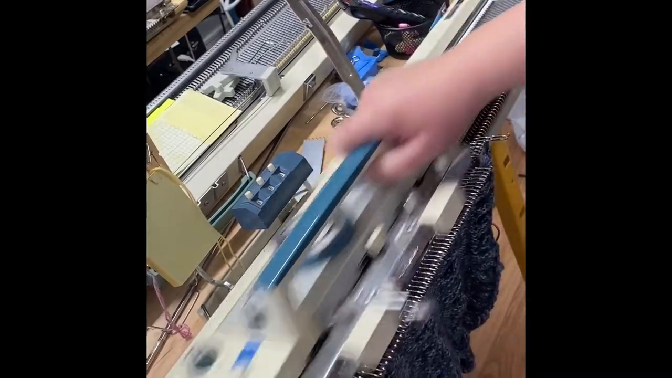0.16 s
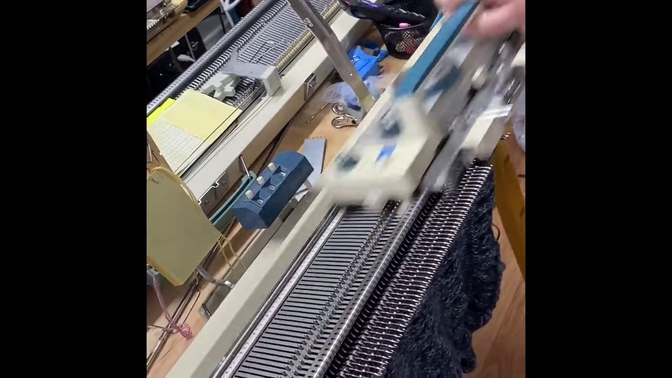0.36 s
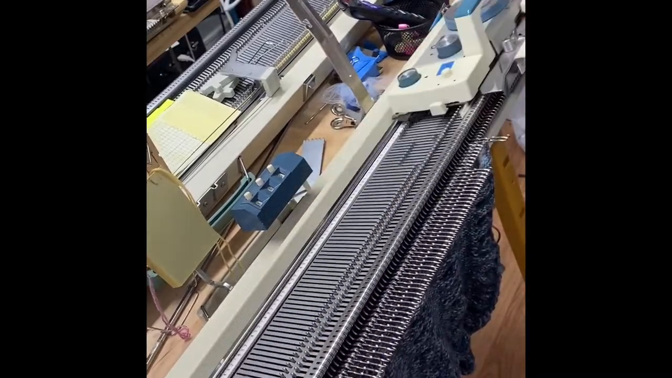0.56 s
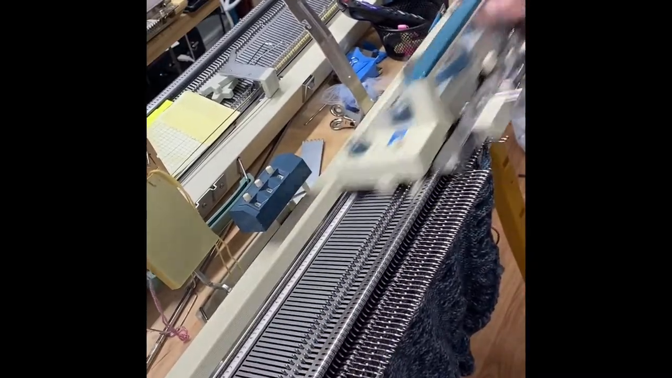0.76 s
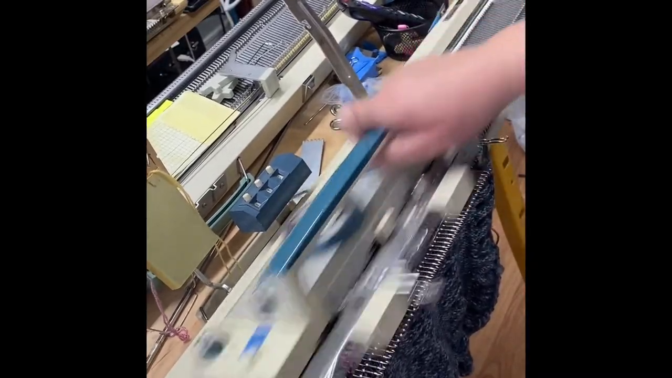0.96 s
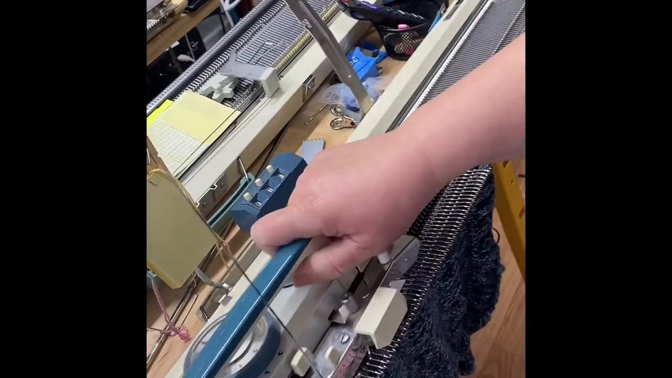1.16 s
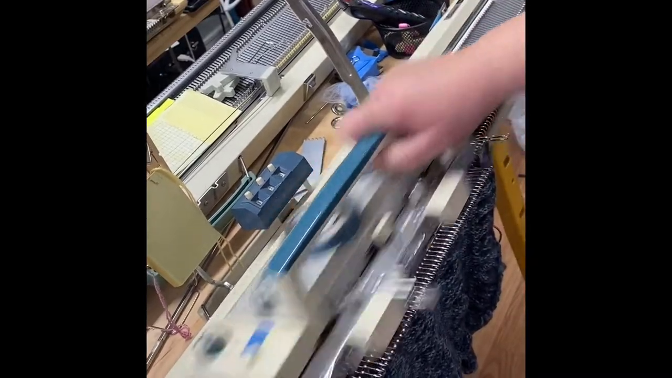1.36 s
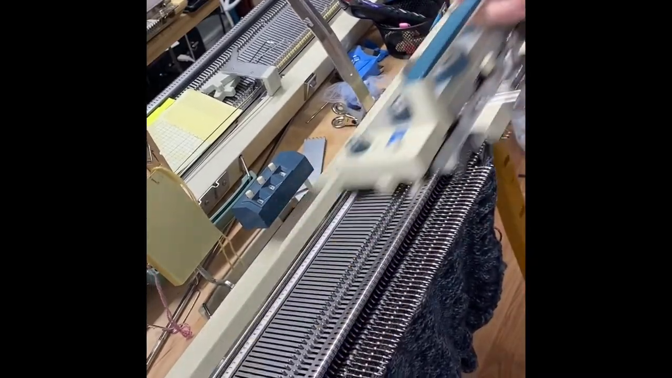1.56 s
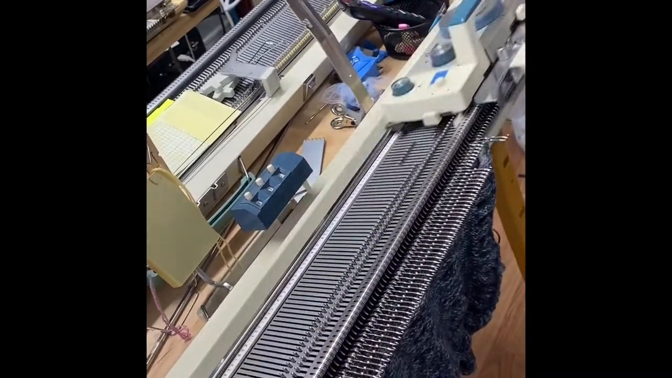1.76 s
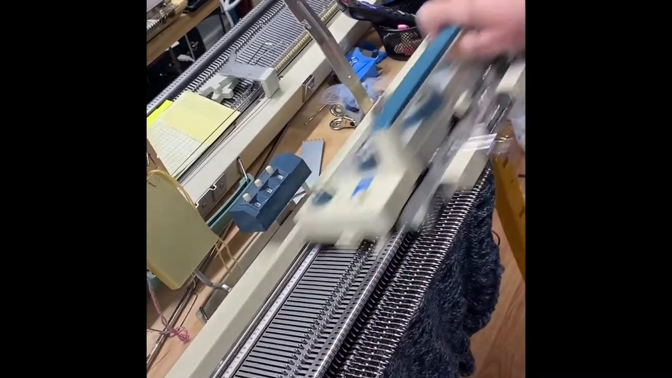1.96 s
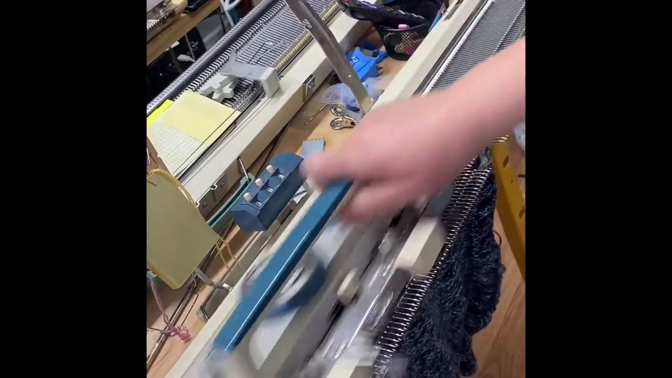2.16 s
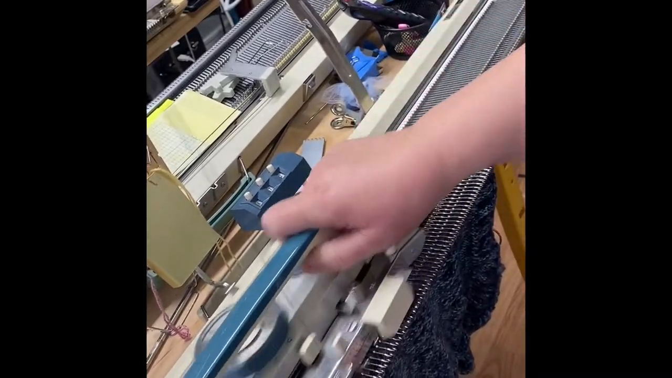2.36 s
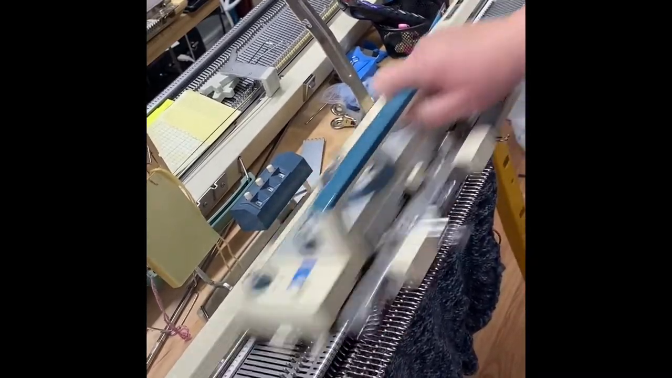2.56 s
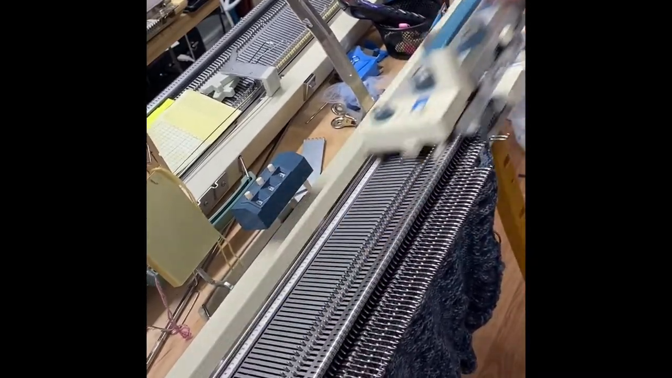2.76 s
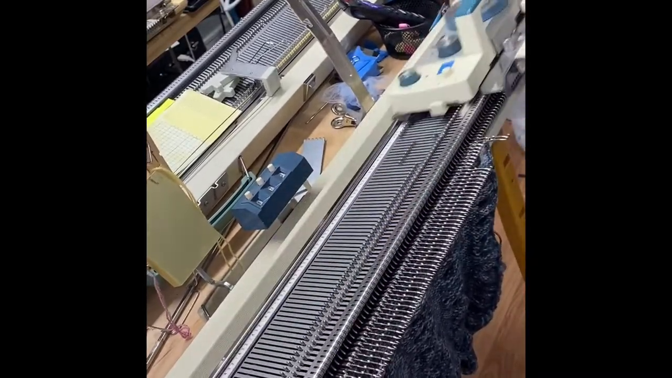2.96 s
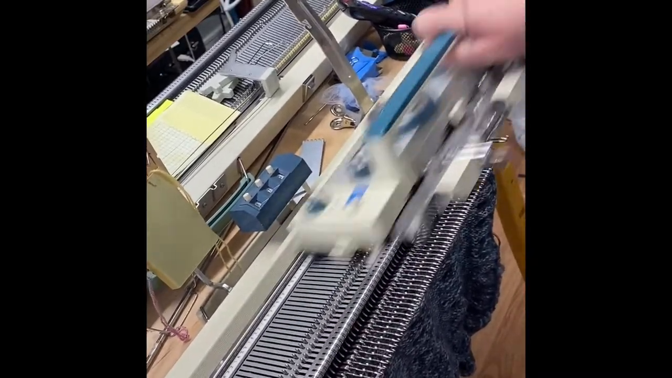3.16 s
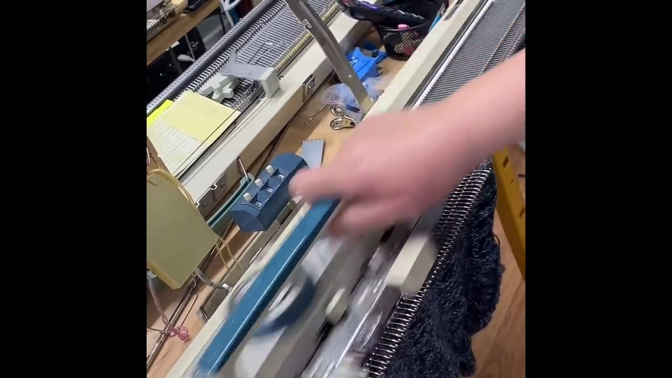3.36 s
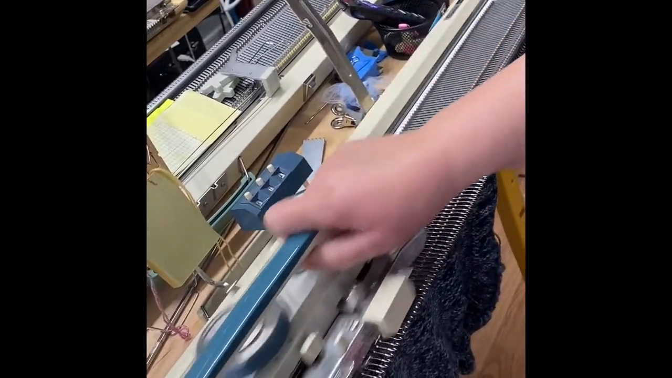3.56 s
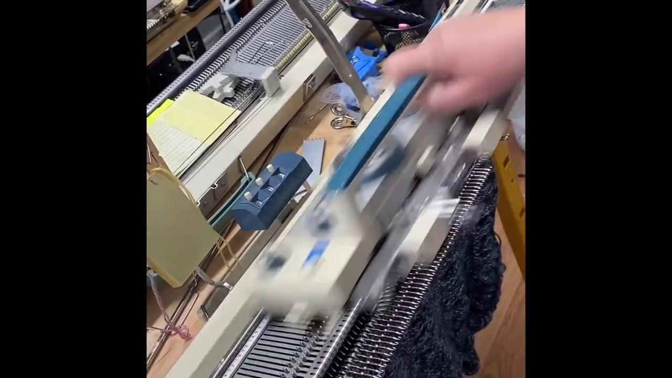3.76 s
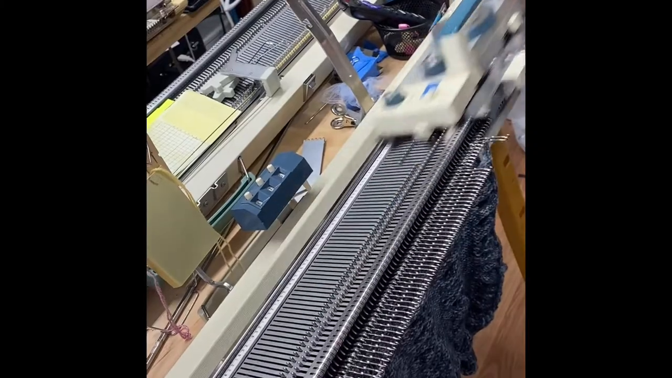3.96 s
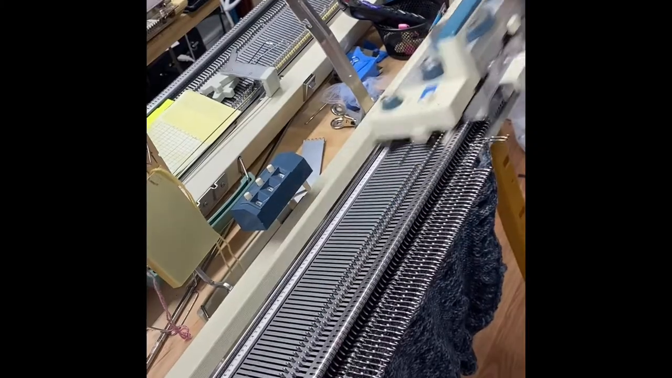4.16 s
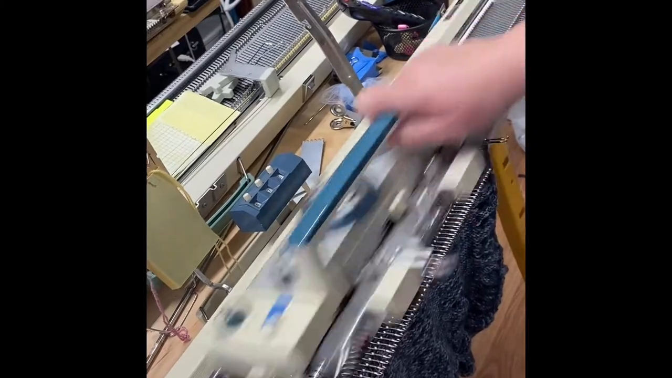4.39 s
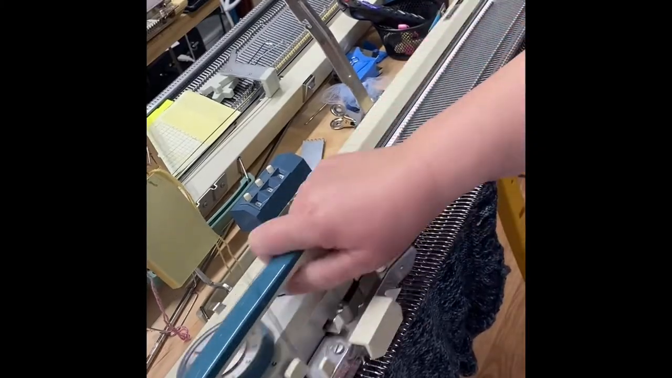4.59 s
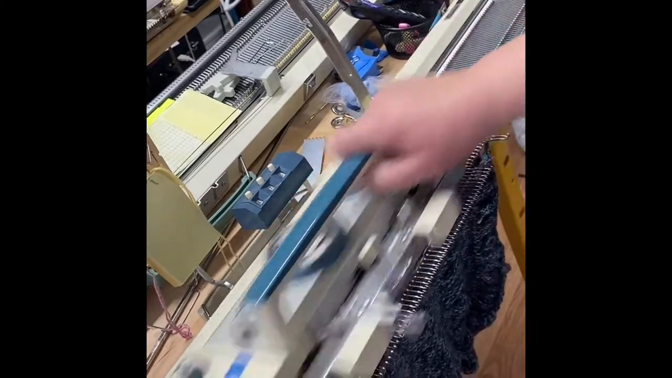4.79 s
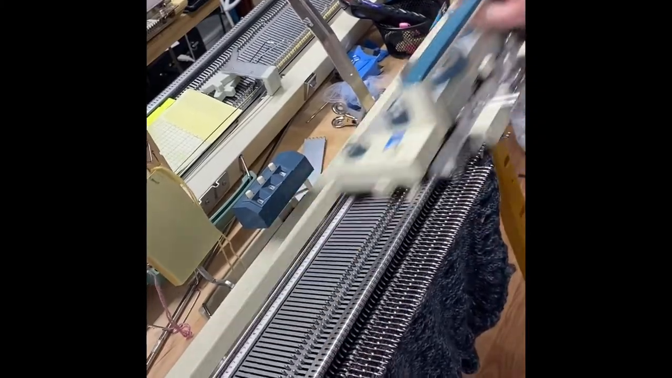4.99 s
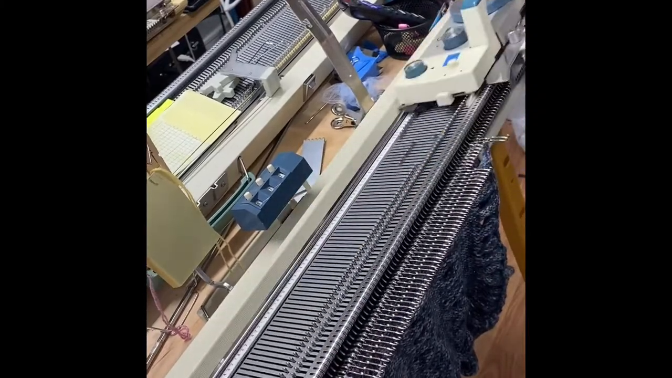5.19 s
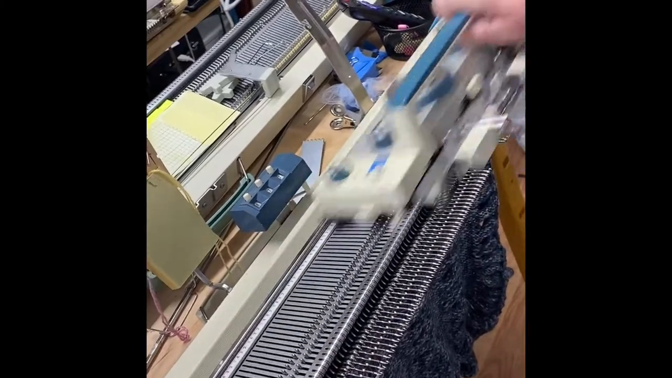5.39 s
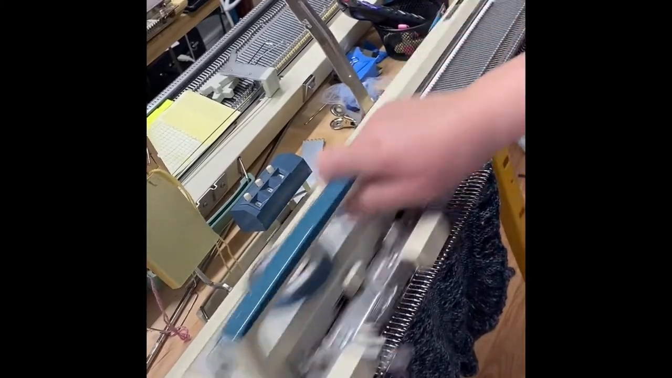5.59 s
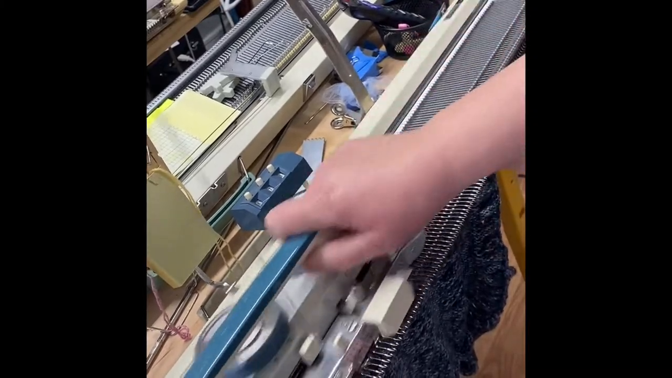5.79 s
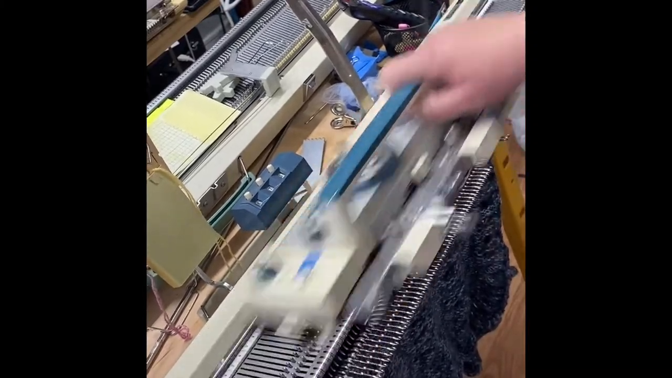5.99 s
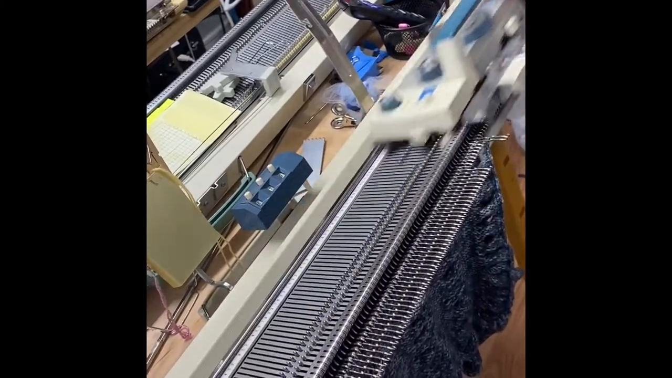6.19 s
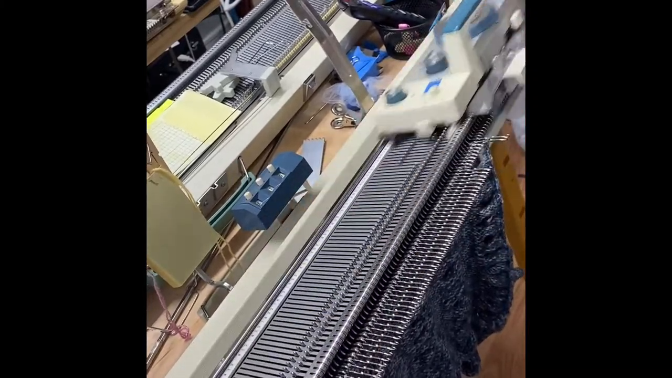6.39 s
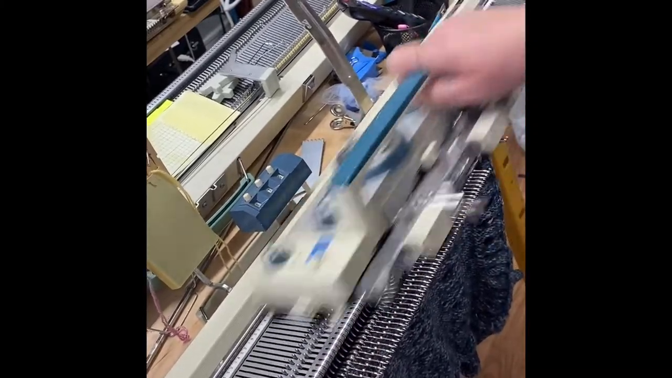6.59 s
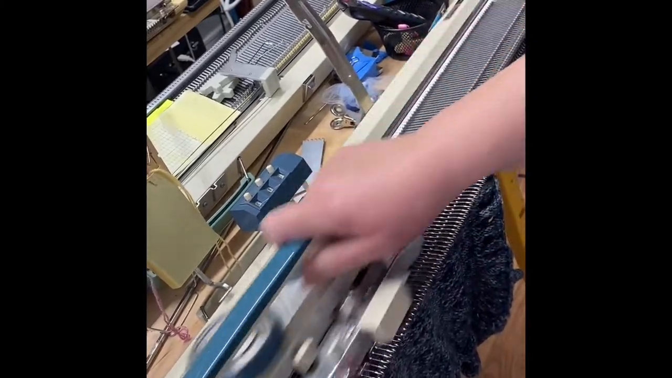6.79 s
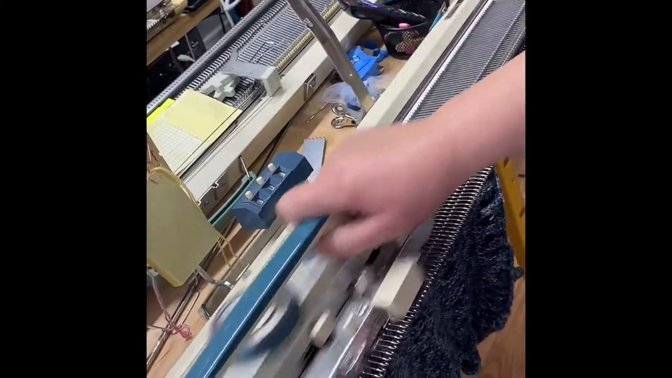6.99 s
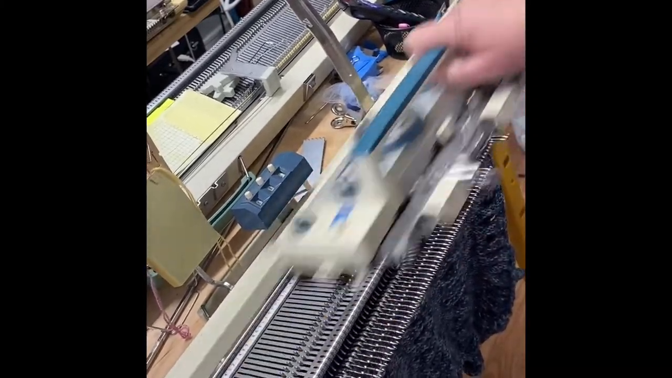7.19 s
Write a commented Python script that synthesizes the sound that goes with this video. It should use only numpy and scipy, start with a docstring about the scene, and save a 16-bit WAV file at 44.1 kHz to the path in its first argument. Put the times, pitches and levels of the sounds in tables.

```python
"""In a small room, close to a phone, a knitting machine carriage is pushed to and fro by hand, thirteen strokes.
Its cams strike the row of steel needles at a rate that follows the speed, and the rails rasp: noise bursts
and steady noise, coloured by the needles and by the ringing of the plate and the bed.
The table rumbles under the load, with dull thuds from the middle of the strokes onward; at each turn the cams
flip over with a tick. A quiet room lies behind, and near walls return a short tail to left and right."""
import sys
import numpy as np
from scipy import signal
from scipy.fft import rfft, irfft, next_fast_len
from scipy.io import wavfile
from scipy.ndimage import uniform_filter1d

SR = 44100
rng = np.random.default_rng(int(sys.argv[2]) if len(sys.argv) > 2 else 0)


def write(x):
    x = np.atleast_2d(x).T
    wavfile.write(sys.argv[1], SR, np.round(np.clip(x, -1, 1) * 32767).astype(np.int16))


N = 319284  # samples
T = np.arange(N) / SR
FFT_SIZE = next_fast_len(N + 8192, True)  # leaves space for the tails
HZ = np.fft.rfftfreq(FFT_SIZE, 1 / SR)

# Strokes, away from the phone and back in turn. Each row: start in seconds, push in dB,
# hurry as the share of the stroke gained by its middle, relative level of the cam tick in dB.
STROKE_ROWS = [(-.005, -0.5, 0.017, -37), (0.5819, 0, -0.023, -32), (1.1664, 0, -.009, -31),
               (1.7367, -0.4, 0.011, -30), (2.3159, -0.16, 0.0026, -29.5), (2.9105, 0.4, -0.012, -31),
               (3.497, 0, -0.0075, -32), (4.0675, -0.1, 0.017, -30.5), (4.6254, 0.56, .002, -31),
               (5.194, .3, 0.02, -27.5), (5.7525, -0.57, 0.0028, -30), (6.3138, -0.3, 0.017, -30.5),
               (6.8915, -0.5, -0.021, -33)]
# Colour of the steel needles. Each row: frequency in Hz, level in dB.
STEEL_COLOUR = [(200, -45), (500, -29.5), (900, -11), (1500, -10), (2300, -7), (2750, -2), (3750, -2.5),
                (4250, -5.5), (4600, -3), (5000, -2), (6300, 1), (7400, -2.4), (10300, 1.5), (13000, -2),
                (15300, -6)]
# Colour of the table's rumble. Each row: frequency in Hz, level in dB.
TABLE_COLOUR = [(20, -40), (35, -36), (50, 1.5), (68, 1), (85, -2), (125, -14), (200, -18), (500, -59)]


def motion(needles_per_stroke=115, last_stop_s=7.46, rest_s=.012, jerk=0.2):
    """The arm jerks off, swings like a pendulum and rests before each turn.

    Returns stroke number, share of it done, place (0 near, 1 far), speed (about 0-1), needles passed.
    """
    start, _, hurry, _ = np.transpose(STROKE_ROWS)
    stroke = np.maximum(np.searchsorted(start, T) - 1, 0)
    length = np.diff(np.append(start, last_stop_s)) - rest_s
    done = np.clip((T - start[stroke]) / length[stroke], 0, 1)
    done = np.clip(done + hurry[stroke] * np.sin(np.pi * done), 0, 1)
    travel = (1 - np.cos(np.pi * done)) / 2
    place = np.where(stroke % 2, 1 - travel, travel)
    # the jerk lifts the speed at the start and fades along the stroke
    speed = (np.sin(np.pi * done) + jerk * (1 - done)) / (1 + jerk / 2)
    speed = np.abs(uniform_filter1d(speed, size=96))  # the carriage's mass rounds the jerk
    passed = needles_per_stroke * (stroke + travel)
    return stroke, done, place, speed, passed


def needle_rattle(speed, passed, size=1600):
    """Every cam hits every needle; needles sit a little loose, so no two blows are alike."""
    # Cams that meet the needles. Each row: place along the carriage in needle spacings, level in dB.
    cam_rows = [(0, 0), (.2, -6), (.5, -8)]
    play, scatter_db = .08, 2.6  # play in needle spacings
    times, sizes = [], []
    for offset, db in cam_rows:
        chance = rng.standard_normal((size, 2))
        where = np.arange(size) + offset + play * chance[:, 0]
        met = where < passed[-1]
        times.append(np.interp(where, passed, T)[met])
        sizes.append(undb(db + scatter_db * np.tanh(chance[:, 1]))[met])
    blows = ticks(np.concatenate(times), np.concatenate(sizes), crack_s=.0012, ring_s=.006, ring_db=-5)
    return unit(blows / np.sqrt(speed + .5))  # slow blows are few, so each stands out more


def contact(speed, passed, rub_db=0.5, grit_db=-0.74, judder_db=0.71, grip_db=0.62):
    """Needle blows over the rasp of the sliding rails, all juddering with the hand's push."""
    rails = undb(rub_db + grit_db * walk(400)) * noise()
    judder = undb(judder_db * walk(70) + grip_db * walk(25))
    return unit((needle_rattle(speed, passed) + rails) * judder)


def needle_ring(drive, place, count=5):
    """The needles ring; each stretch of the bed has its own reflections, so the colour shifts with travel."""
    # Peaks of the needles' ring. Each row: frequency in Hz, width in Hz, dB relative to their colour.
    needle_peaks = [(1940, 28, -10), (3700, 340, -21), (4910, 63, 1.5), (5370, 180, -7.5)]
    # Change of colour from the near to the far end of the bed. Each row: frequency in Hz, change in dB.
    far_change = [(500, 22.5), (1000, 2), (1500, -2), (2100, 9), (3000, -10.5), (4000, -1), (5500, 2.5),
                  (8000, -2), (14000, 3.5)]
    ring = rfft(drive, FFT_SIZE) * colour(STEEL_COLOUR) * (1 + modes(needle_peaks))
    far, out = colour(far_change), 0
    for spot in np.linspace(0, 1, count):
        nearness = np.maximum(1 - np.abs(place - spot) * (count - 1), 0)
        out = out + nearness * irfft(ring * far ** (spot - .5) * bounces(), FFT_SIZE)[:, :N]
    return unit(out)


def needles(drive, done, place, speed):
    """The needles' ring grows steeply with the carriage's speed."""
    # Answer to the motion: level in dB, power of speed, dB gained over a stroke, dB gained at the far end.
    needle_law = (-20.5, 1.8, 1, .3)
    return needle_ring(drive, place) * effort(needle_law, done, place, speed)


def snaps(snap_db=-2, flip_db=-3, slide_db=-18, slide_s=0.0072):
    """The cams slide over and seat with a tick as each stroke begins; now and then a needle snaps past."""
    # Single needles snapping past. Each row: time in seconds, relative level in dB.
    snap_rows = [(0.6499, -25), (0.6838, -24), (0.6933, -20), (0.701, -18), (0.7064, -23), (1.413, -7),
                 (1.816, -12), (2.9911, -33), (3.589, -27), (3.6034, -27), (4.1275, -27), (4.85, -13),
                 (5.2639, -25), (6.4083, -27)]
    start, _, _, tick_db = np.transpose(STROKE_ROWS)
    times, db = np.transpose(snap_rows)
    slide_sizes = undb(tick_db + flip_db + slide_db)
    slides = ticks(start - slide_s, slide_sizes, crack_s=0.0073, ring_s=.02, ring_db=-2)
    flip_sizes = undb(tick_db + flip_db)
    flips = ticks(start + 0.00092, flip_sizes, crack_s=0.0016, ring_s=0.037, ring_db=-8.5, size=4096)
    snapped = ticks(times, undb(db + snap_db), crack_s=0.0011, ring_s=0.024, ring_db=-16.0)
    return filtered(slides + flips + snapped, colour(STEEL_COLOUR))


def carriage_plate(drive, done, place, speed):
    """The carriage plate rings with the contact and with smooth rubbing from the rails; its level wavers."""
    # Ringing of the plate. Each row: frequency in Hz, width in Hz, level in dB.
    plate_modes = [(716, 8.1, -5), (850, 21, 0), (992, 88, -1.5), (1335, 54, -9), (1443, 60, 2.5),
                   (1630, 700, -1.5), (2047, 53, 8)]
    # Answer to the motion: level in dB, power of speed, dB gained over a stroke, dB gained at the far end.
    plate_law = (-36.5, 2.03, 12.5, 4)
    ring = unit(filtered(drive + 1.06 * noise(), modes(plate_modes)))
    return ring * effort(plate_law, done, place, speed) * undb(2.4 * walk(30))


def needle_bed(drive, done, place, speed):
    """The bed rings lower, driven by the same contact and smooth rubbing; its level wavers."""
    # Ringing of the bed. Each row: frequency in Hz, width in Hz, level in dB.
    bed_modes = [(174.5, 14, -2), (271.4, 25, 4.5), (338.7, 44, 2), (452, 34, 1), (548, 60, -3.5),
                 (650, 190, -7)]
    # Answer to the motion: level in dB, power of speed, dB gained over a stroke, dB gained at the far end.
    bed_law = (-49.5, 0.85, 4.5, -1.5)
    ring = unit(filtered(drive + noise(), modes(bed_modes)))
    return ring * effort(bed_law, done, place, speed) * undb(2.1 * walk(20))


def bites(stroke, done):
    """Gains of needles, plate and bed where the cams bite into the knitting."""
    # Bites on strokes away from the phone. Each row: place as a share of the stroke, length as a share,
    # then dB added to needles, plate and bed.
    away_rows = [(.16, 0.077, -0.1, 0, 6), (.4, 0.057, 2, 2, 4), (.52, 0.015, 1.6, 5, 2),
                 (.62, 0.053, -1.4, 1.5, 9.5), (.78, 0.083, 2, -4, -3.5)]
    # Bites on strokes back. Each row: place and length as shares of the stroke, then dB as above.
    back_rows = [(.06, .03, -2, 13, 4), (.19, .06, 1, 1.5, .5), (.38, .07, 1.2, -0.4, 1.5),
                 (.52, 0.034, .5, 5, 0.45), (.66, 0.025, 0.9, 4, 2.5), (.82, 0.11, 2, -.5, 5)]

    def extra_db(rows):
        return sum(np.outer(db, np.exp(-((done - at) / length) ** 2)) for at, length, *db in rows)

    return undb(np.where(stroke % 2, extra_db(back_rows), extra_db(away_rows)))


def table_rumble(done, place, speed):
    """Low noise of the table under the load; it depends only weakly on speed."""
    # Answer to the motion: level in dB, power of speed, dB gained over a stroke, dB gained at the far end.
    table_law = (-60, 0.17, 7.5, -4)
    return unit(filtered(noise(), colour(TABLE_COLOUR))) * effort(table_law, done, place, speed)


def thuds(thud_db=-1, build_s=.01):
    """Single shoves that the table answers with a few slow cycles, strongest just after the shove."""
    # Dull thuds from the middle of the strokes onward. Each row: time in seconds, relative level in dB.
    thud_rows = [(0.282, -47), (0.351, -37), (1.008, -40), (1.074, -45), (1.54, -39), (2.151, -40),
                 (2.613, -48), (2.676, -40), (2.739, -46), (3.375, -48), (3.855, -40), (4.481, -39),
                 (4.989, -40), (5.529, -47), (5.586, -40), (5.655, -47), (6.034, -46), (6.099, -43),
                 (6.159, -48), (6.735, -47), (6.811, -47)]
    # Slow sway of the table top. Each row: frequency in Hz, width in Hz, level in dB.
    sway_modes = [(50, 12, -1), (67.6, 14, 0), (82, 22, -6)]
    times, db = np.transpose(thud_rows)
    shoves = np.bincount(((times - build_s) * SR).astype(int), undb(db + thud_db), N)
    response = colour(TABLE_COLOUR) * modes(sway_modes)
    return filtered(shoves, response) / np.abs(irfft(response)).max()


def quiet_room():
    """Steady coloured noise of the room behind the machine."""
    # Colour of the quiet room. Each row: frequency in Hz, level in dB.
    air_colour = [(20, -20), (55, -10), (120, 0), (300, -8.5), (1000, -12), (5000, -10), (16000, -14)]
    return unit(filtered(noise(), colour(air_colour))) * undb(-54.5)


def wall_tail(x, wet_db=-13, t60_s=0.32, size=8192):
    """Near walls return a short, dull tail to each side."""
    age = np.arange(size) / SR
    tail = rng.standard_normal((2, size)) * undb(-60 * age / t60_s) * (age > .005)
    tail /= np.sqrt(np.sum(tail ** 2, axis=1, keepdims=True))
    dullness = colour([(100, -42), (600, 10), (5000, -25.5), (15000, -59.0)])
    return undb(wet_db) * filtered(x, rfft(tail, FFT_SIZE) * dullness)


def ports(x):
    """Sound reaches two ports around the phone; a share of the sound differs between left and right."""
    # Phase between the ports. Each row: frequency in Hz, lead of the left in radians.
    port_phase = [(0, 0), (860, .15), (1300, -.1), (2100, 0), (2700, .45), (4300, .55), (5100, .1),
                  (5700, .9), (6400, 2.5), (7000, 3.1), (8100, 3.3), (9700, 6), (11300, 6.6), (12500, 9),
                  (14300, 9.6), (15400, 12)]
    # Sound that differs between the ports. Each row: frequency in Hz, level in dB.
    port_spread = [(60, -40), (200, -21), (400, -15), (700, -8), (1000, -15), (1800, -20), (2800, -12),
                   (4300, -10), (5100, -15), (6200, -12), (7400, -19), (9000, -10), (13500, -15),
                   (15000, -10)]
    mid, side = x[0], filtered(x[1], colour(port_spread))
    lead = np.exp(.5j * np.interp(HZ, *np.transpose(port_phase)))  # half the lead on each port
    return filtered(np.array([mid + side, mid - side]), np.array([lead, 1 / lead]))


def effort(law, done, place, speed, creep=0.026):
    """Gain of one part: it grows with speed and shifts along the stroke and along the bed."""
    full_db, power, late_db, far_db = law
    return (speed + creep) ** power * undb(full_db + late_db * (done - .5) + far_db * (place - .5))


def ticks(times, sizes, crack_s, ring_s, ring_db, size=640):
    """Steel contacts: noise bursts with a sharp crack and a brief dense ring, overlaps adding in power."""
    age = np.arange(size) / SR
    shape = np.exp(-age / crack_s) + undb(ring_db) * np.exp(-age / ring_s)
    blows = np.bincount(np.clip(times * SR, 0, N).astype(int), sizes ** 2, N)
    power = np.abs(signal.oaconvolve(blows, shape ** 2)[:N])
    return np.sqrt(power) * noise()


def bounces(size=768, echo_db=-8, echo_s=.004):
    """Response of the direct sound plus quick reflections off the machine: a fine ripple in the colour."""
    echoes = rng.standard_normal(size) * np.exp(-np.arange(size) / SR / echo_s)
    return 1 + undb(echo_db) * rfft(echoes / np.linalg.norm(echoes), FFT_SIZE)


def noise():
    """Two unrelated noises: what the ports share and what differs between them."""
    return rng.standard_normal((2, N))


def walk(rate):
    """Random wavering with a spread near 1, in straight lines between knots at a rate per second."""
    knots = rng.standard_normal(4096)
    return 1.2 * np.interp(T * rate, np.arange(len(knots)), knots)


def undb(db):
    """Amplitude gain from dB."""
    return 10 ** (np.asarray(db) / 20)


def unit(x):
    """Scale to rms 1."""
    return x / np.sqrt(np.mean(x ** 2))


def colour(points):
    """Gain at every frequency from (Hz, dB) points."""
    hz, db = np.transpose(points)
    return undb(np.interp(np.log(HZ + 1), np.log(hz), db))


def modes(rows):
    """Summed response of resonances given as (Hz, width in Hz, dB)."""
    return sum(undb(db) * 1j * HZ * width / (hz ** 2 - HZ ** 2 + 1j * HZ * width)
               for hz, width, db in rows)


def filtered(x, response):
    """Pass a sound through a frequency response."""
    return irfft(rfft(x, FFT_SIZE) * response, FFT_SIZE)[..., :N]


def scene():
    """One push drives needles, plate and bed; the table rumbles and thuds beside them."""
    stroke, done, place, speed, passed = motion()
    push = undb(np.array(STROKE_ROWS)[stroke, 1])
    on_needles, on_plate, on_bed = push * bites(stroke, done)
    drive = contact(speed, passed)
    machine = needles(drive, done, place, speed) * on_needles + snaps()
    machine = machine + carriage_plate(drive, done, place, speed) * on_plate
    machine = machine + needle_bed(drive, done, place, speed) * on_bed
    direct = ports(machine + table_rumble(done, place, speed) + quiet_room())
    return direct + thuds() + wall_tail(machine[0])


def record(dry, top_hz=15700):
    """The phone cuts the top with a steep low-pass."""
    return signal.sosfilt(signal.ellip(10, .2, 80, top_hz, fs=SR, output="sos"), dry)


dry = scene()
out = record(dry)
write(out)
```